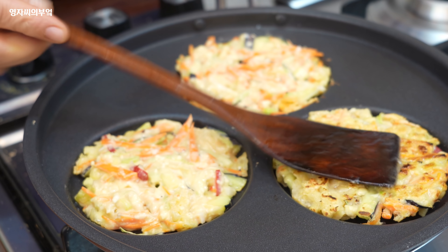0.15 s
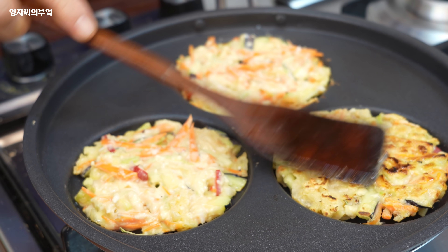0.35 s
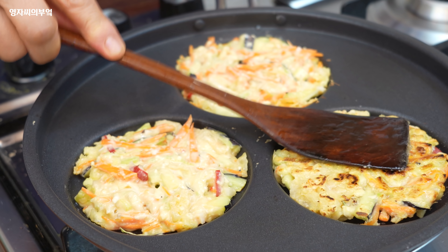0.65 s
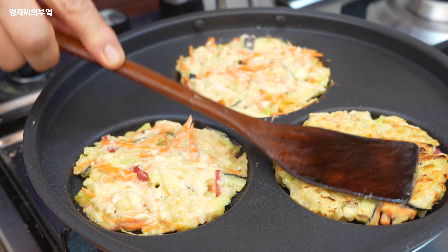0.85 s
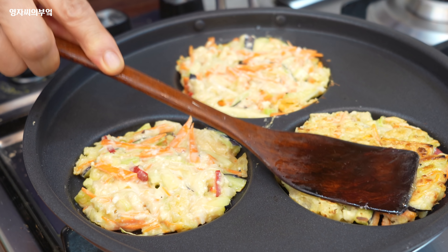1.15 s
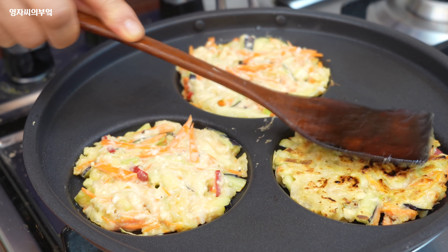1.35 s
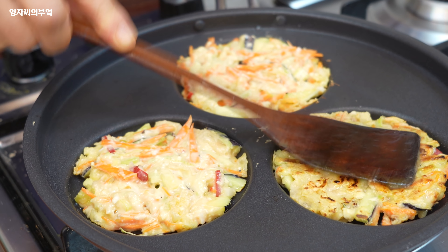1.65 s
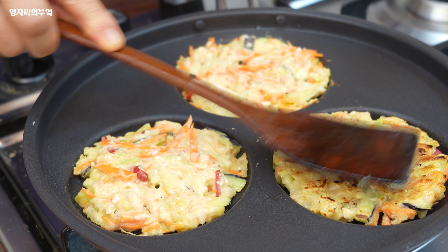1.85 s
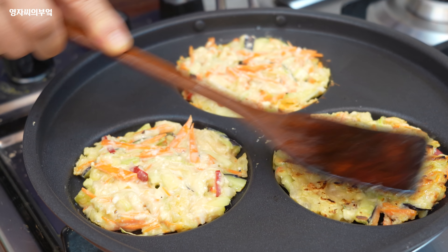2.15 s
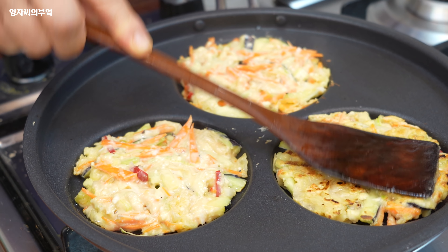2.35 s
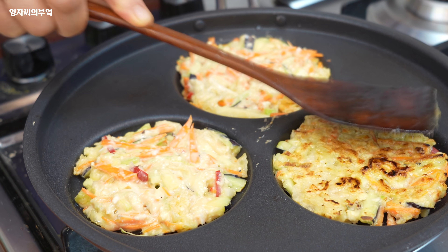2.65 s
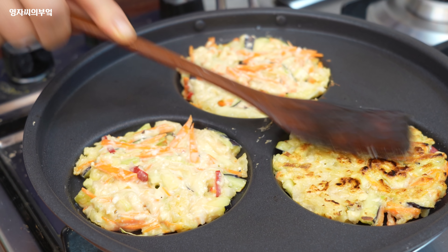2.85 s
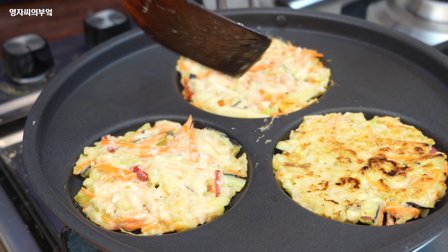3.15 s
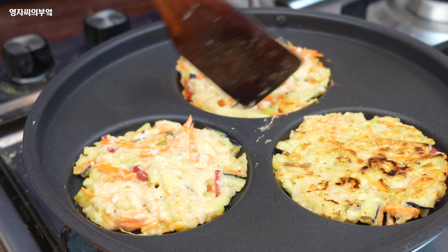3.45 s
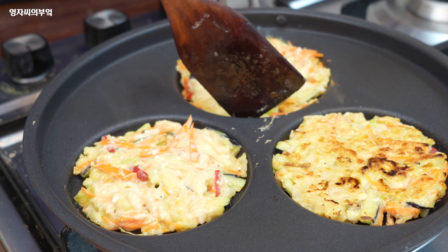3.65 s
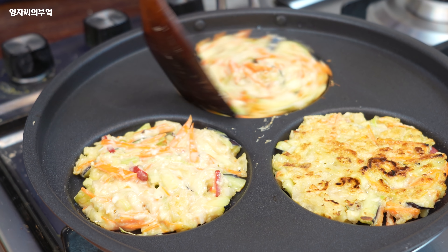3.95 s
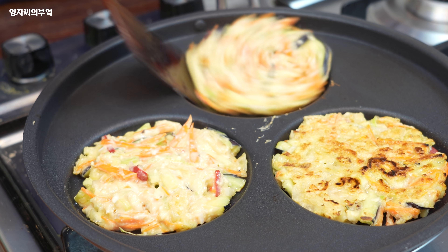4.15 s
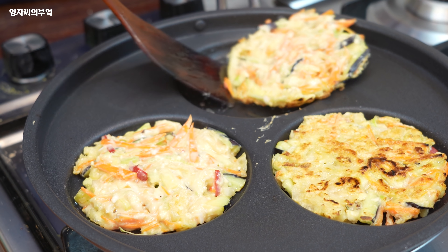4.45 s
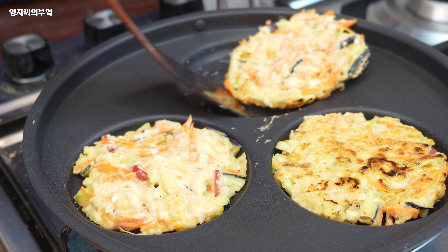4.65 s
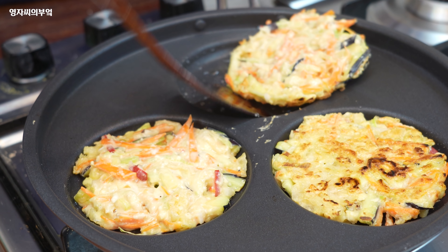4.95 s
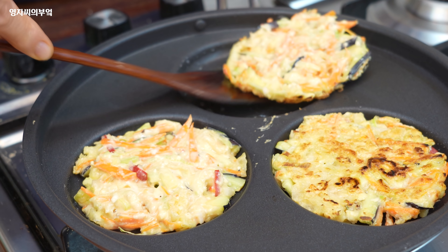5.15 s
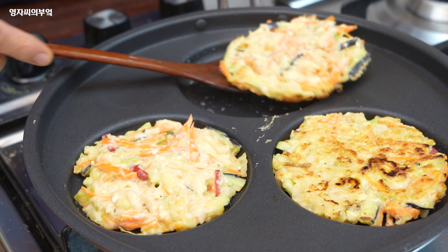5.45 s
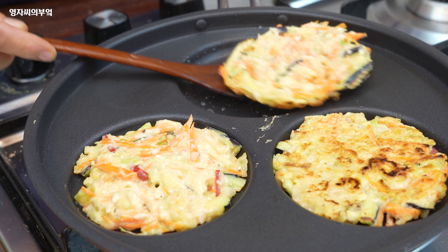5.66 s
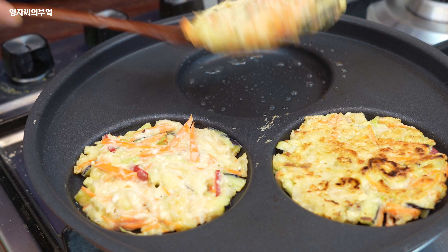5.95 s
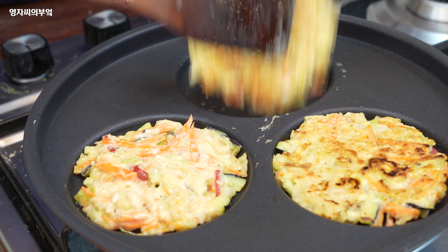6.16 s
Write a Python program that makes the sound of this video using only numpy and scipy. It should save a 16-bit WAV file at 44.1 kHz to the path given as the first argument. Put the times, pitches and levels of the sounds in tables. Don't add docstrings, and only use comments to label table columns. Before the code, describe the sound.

Hot oil sizzles and spits close up while a wooden spatula softly pats food, then scrapes and knocks on the pan as a cake is turned.

```python
import sys
import numpy as np
from scipy import signal
from scipy.fft import rfft, irfft
from scipy.io import wavfile

SR = 44100
rng = np.random.default_rng(int(sys.argv[2]) if len(sys.argv) > 2 else 0)


def store_wav(level_fs):
    pcm = np.round(np.clip(np.atleast_2d(level_fs), -1, 1) * 32767)
    wavfile.write(sys.argv[1], SR, pcm.T.astype(np.int16))


def decibels_to_gain(level_db):
    exponent = np.asarray(level_db, float) / 20
    return 10 ** exponent


N = 278271

# f/Hz, density/dB
SIZZLE_SPECTRUM = [(710, -15), (1200, -7.5), (2320, -8.5), (2560, -7), (3080, -7), (6570, -3),
                   (10500, -1.5), (12700, -3), (13800, -0.5), (15650, -2), (15950, -28), (16500, -75)]
# t/s, level/dB, lower sizzle relative/dB
SIMMER = [
    (0, -32.5, -5),
    (.9, -33.5, -6),
    (1.4, -36.5, -5.5),
    (2.9, -33.5, -6),
    (3.75, -37, -6),
    (4.3, -30, -4.5),
    (4.9, -35, -7),
    (5.5, -37, -7),
    (5.85, -38.5, -8.5),
    (6.31, -38.5, -5),
]
# peak t/s, level/dB, half width/s, lower sizzle relative/dB
SURGES = [(0, -25, 0.022, -5), (.67, -24, 0.064, -5), (1.018, -26.5, 0.058, -2.5), (1.26, -32, 0.051, -1.5),
          (1.55, -30.5, 0.066, -5), (1.82, -34.5, .06, -3.5), (2.079, -25.5, 0.046, -3),
          (2.36, -40, 0.1, -4), (2.61, -32.5, 0.042, -2.5), (2.812, -29, 0.052, -3),
          (4.101, -23, 0.032, -4.5), (4.17, -28.5, .03, -1), (4.37, -22, 0.012, -7),
          (4.42, -20, 0.012, -3.5), (4.464, -22.5, 0.014, -4.5), (4.5, -22.5, 0.019, -9),
          (4.54, -22, .02, -13), (4.69, -37, 0.068, -11), (4.93, -36, 0.015, -8), (5.149, -28, 0.063, -5),
          (5.3, -32.5, .04, -6), (5.46, -35.5, 0.05, -2), (5.64, -35, 0.027, 0), (6.29, -26, 0.021, -9.5)]
# t/s, level over the steam/dB
CRACKLE = [
    (0, -2),
    (3.9, -4.5),
    (4.15, 8),
    (4.9, -1.5),
    (5.3, -3),
    (5.8, 0),
    (6.31, -2),
]
# f/Hz, density/dB
RUMBLE_SPECTRUM = [(12, -30), (20, -29), (70, -11), (166, 1), (281, 6), (346, 0.5), (623, 2), (736, -23),
                   (835, 1), (1300, 1.5), (3000, -5.5), (3900, -55), (6600, -120)]
# t/s, level/dB
JOLTS = [(.21, -44), (.34, -47), (1.21, -49), (1.54, -39), (1.76, -43), (2.0, -47), (2.6, -42), (2.83, -42),
         (3.09, -44), (3.69, -52), (4.06, -52), (4.29, -61), (4.52, -41), (5.24, -37.5), (5.37, -36),
         (6.31, -45)]
# f/Hz, level struck with the flat/dB, level struck with the edge/dB, t60/s
PAN_MODES = [(296, -16, -13, .16), (385, -12, -13, .15), (455, -10, -10, .16), (590, -13, -6, .1),
             (637, -12, -4, .13), (830, 3, -1, .11), (875, 1, -2, .1), (969, -5, -1, .17),
             (1134, -5, -6, .11), (1373, -3, -6, .13), (1670, -8, -9, .1), (1765, -6, -7, .1),
             (1846, 1, -9, .11), (1984, 1, -9, .1), (2530, -12, -6, .09), (3200, -20, -5, .09),
             (3600, -9, 4, .09)]
# t/s, level/dB
RESTING = [
    (0, -48.5),
    (5.7, -48.5),
    (6.31, -67),
]
# middle t/s, level/dB, half width/s
STROKES = [
    (0, -45, 0.21),
    (4.08, -34.5, 0.12),
    (4.4, -30, 0.14),
    (5.13, -38, 0.085),
    (5.4, -38.5, 0.12),
]
# t/s, peak level/dB, colour f/Hz, squash length/s
SQUASHES = [(.002, -31.5, 590, 0.19), (1.2, -33, 424, 0.033), (1.73, -33, 221, 0.02),
            (4.285, -28.5, 300, 0.039), (6.275, -32, 277, 0.035), (0.581, -29, 820, 0.021),
            (0.629, -29.5, 507, 0.017), (0.659, -37, 241, .04), (0.931, -25.5, 640, 0.027),
            (1.452, -22.5, 677, 0.033), (1.727, -23.5, 700, 0.042), (1.999, -26.5, 670, 0.037),
            (2.291, -16.5, 675, .019), (2.561, -32, 397, 0.037), (2.777, -20.5, 710, 0.027),
            (2.791, -29, 231, 0.022), (3.648, -33.5, 430, 0.036), (4.021, -29, 388, .03),
            (5.39, -23, 220, 0.032), (5.6, -26.5, 250, .045)]
# t/s, peak level/dB, colour f/Hz
TICKS = [(1.099, -27, 1500), (1.192, -21.5, 1140), (1.441, -20.5, 1320), (1.716, -18.5, 1670),
         (1.964, -22, 1390), (2.28, -27, 1000), (2.326, -28, 570), (2.519, -24.5, 1200), (2.771, -15, 1080),
         (2.982, -23.5, 1290), (3.648, -30, 1480), (3.819, -29, 1780), (4.113, -21, 1340),
         (5.553, -25, 2810), (5.585, -22.5, 1200), (6.041, -26, 1900), (6.233, -27, 1290)]
# t/s, peak level/dB, colour f/Hz
LOUD_SPITS = [(0.115, -12, 13500), (0.3805, -13, 7840), (0.5602, -11, 5340), (0.7158, -15, 5850),
              (0.7964, -7.5, 9400), (0.8006, -9, 7100), (0.83, -10.5, 10200), (0.9787, -13, 6800),
              (1.2994, -17, 5570), (1.6322, -11.5, 10800), (1.6566, -16, 8940), (1.715, -11, 7800),
              (1.732, -16, 10600), (1.8957, -19, 13400), (1.9635, -14, 7200), (1.9809, -20, 7420),
              (2, -10, 5100), (2.4615, -7.5, 7800), (2.5102, -36, 13200), (2.638, -8, 8500),
              (2.931, -15, 10700), (3.3074, -5, 12800), (3.4531, -23, 13900), (3.486, -8.5, 5160),
              (3.4983, -15, 10500), (3.7392, -18, 7600), (3.8472, -16, 10600), (3.884, -14, 8900),
              (3.918, -18, 13400), (4.0156, -16, 13800),
              (4.1407, -2, 8650), (4.1825, -1.5, 6560), (4.3157, -3, 6200), (4.3457, -9.5, 12600),
             (4.379, -8, 14000), (4.4344, -5, 10300), (4.4618, -1, 13400), (4.4732, -3, 11500),
             (4.5534, -5, 13400), (4.599, -12, 11100), (4.6057, -2, 12100), (4.6478, -5, 11100),
             (4.687, -9, 11400), (4.7164, -2.5, 12100), (4.7833, -6.5, 11200), (4.807, -10, 14000),
             (4.8477, -12, 14100), (4.9203, -14.5, 12200), (5.136, -5.5, 13300), (5.1522, -5, 13500),
             (5.176, -1.5, 13300), (5.2247, -15, 13400), (5.2505, -9, 12300), (5.285, -14, 13900),
             (5.4352, -8, 14100), (5.5526, -14, 13300), (6.0422, -10, 8200), (6.1459, -12.5, 13400),
             (6.19, -13.5, 7800), (6.2165, -13.5, 13900)]
# middle t/s, rate/dB re 1 per s, half width/s
BARE_OIL = [
    (4.15, 31, .06),
    (4.45, 36.5, .15),
    (4.75, 36, .15),
    (5.15, 30.5, .1),
    (5.5, 30, .2),
]
# t/s, peak level/dB, favoured f/Hz, breadth/octaves, edge share/0-1
KNOCKS = [(.983, -36, 970, 0.068, 1), (4.284, -15.5, 990, 3.4, 0.3), (4.4079, -3, 1630, 2.8, 1),
          (4.4525, -16, 860, 0.21, .4), (4.5692, -6.5, 1220, 3.8, 0.9), (4.679, -20.5, 1800, 1.6, 0),
          (4.93, -32, 940, 1.1, 0.5), (5.034, -47, 970, 0.27, .5), (5.044, -27.5, 3120, 0.15, 0.5),
          (5.137, -26, 1680, .8, 0.1), (5.09, -39.5, 905, 0.34, 0), (5.21, -36, 1950, 0.26, 0.1),
          (5.2756, -3.5, 1550, 4.1, 0), (5.291, -14, 820, 0.43, 0.5), (5.347, -22.5, 600, 0.98, 0.4),
          (5.385, -24.5, 590, 0.85, 0.5), (5.458, -13, 775, 1.3, 0.76), (5.606, -27, 550, 0.86, 0),
          (6.272, -12, 1420, 0.97, .7), (6.293, -24, 975, 0.36, 0.2)]


def rms_one(x):
    return x / np.sqrt(np.mean(x ** 2) + 1e-20)


def in_time(rows):
    s, *columns = np.transpose(rows)
    return [np.interp(np.arange(N) / SR, s, c) for c in columns]


def swells(rows):
    t = np.arange(N) / SR
    return np.array([decibels_to_gain(2 * row[1]) * np.exp(-((t - row[0]) / row[2]) ** 2) for row in rows])


def drift(rate_hz):
    r = np.exp(-2 * np.pi * rate_hz * 40 / SR)
    slow = signal.lfilter([1], [1, -2 * r, r * r], rng.standard_normal(N // 40 + 2002))[2000:]
    return np.interp(np.arange(N) / 40, np.arange(len(slow)), rms_one(slow))


def ring(clicks, hz, t60):
    r = decibels_to_gain(-60 / (t60 * SR))
    w = 2 * np.pi * hz / SR
    return signal.lfilter([0, np.sin(w)], [1, -2 * r * np.cos(w), r * r], clicks + 1e-18)


def colour(x, spectrum):
    hz, db = np.transpose(spectrum)
    gain = decibels_to_gain(np.interp(np.log(np.fft.rfftfreq(N, 1 / SR) + 1), np.log(hz), db))
    return rms_one(irfft(rfft(x) * gain, N))


def split(x, hz, kind):
    return signal.sosfilt(signal.butter(2, hz, kind, fs=SR, output="sos"), x)


def grains(per_s, spread_db):
    sizes = decibels_to_gain(spread_db * np.minimum(rng.exponential(1, N), 4)) * rng.choice([-1, 1], N)
    return sizes * (rng.random(N) < per_s / SR)


def add(out, s, sound, peak_db):
    at = round(s * SR)
    out[at:at + len(sound)] += (decibels_to_gain(peak_db) * sound / np.abs(sound).max())[:N - at]


def frying():
    simmer_db, simmer_lower_db = in_time(SIMMER)
    simmer = decibels_to_gain(2 * simmer_db)
    surge = swells(SURGES)
    power = simmer + surge.sum(axis=0)
    lower_db = (simmer * simmer_lower_db + np.array(SURGES)[:, 3] @ surge) / power
    return 10 * np.log10(power), lower_db


def sizzle():
    level_db, lower_db = frying()
    crackle = decibels_to_gain(in_time(CRACKLE)[0])
    clumps = np.tanh(1.4 * drift(27))
    bursts = grains(2500 * decibels_to_gain(4.6 * clumps), spread_db=3.5)
    dealt = rng.integers(0, 16, N)
    bubbles = np.zeros(N)
    for k, hz in enumerate(np.geomspace(3000, 15500, 16)):
        bubbles += rms_one(ring(bursts * (dealt == k), hz, 9.5 / hz)) * np.sqrt(hz)
    steam = rng.standard_normal(N) * decibels_to_gain(0.19 * drift(45) + 0.88 * crackle * clumps)
    mix = (steam + crackle * rms_one(bubbles)) / np.hypot(1, crackle)
    mix = colour(mix, SIZZLE_SPECTRUM)
    low = split(mix, [3500, 7500], "band")
    return decibels_to_gain(level_db - 2.5) * (mix + (decibels_to_gain(lower_db + 7.0) - 1) * low)


def stove():
    burner = decibels_to_gain(-53 + 2.76 * drift(9.3)) * colour(rng.standard_normal(N), RUMBLE_SPECTRUM)
    shaking = split(split(rng.standard_normal(N), [38, 110], "band"), 240, "low")
    calm_db, jolt_s = -56, .03
    power = decibels_to_gain(2 * calm_db) + swells([(s, db, jolt_s) for s, db in JOLTS]).sum(axis=0)
    return burner + decibels_to_gain(-7.0) * np.sqrt(power) * rms_one(shaking)


def pan(force, strengths):
    damping = .5
    modes = zip(PAN_MODES, strengths)
    return sum(gain * ring(force, hz, damping * t60) for (hz, flat_db, edge_db, t60), gain in modes)


def rubbing():
    slips = grains(700, spread_db=3.0)
    body = rms_one(pan(slips, decibels_to_gain(np.array(PAN_MODES)[:, 1])))
    scrape = rms_one(split(slips, [500, 2600], "band"))
    power = decibels_to_gain(2 * in_time(RESTING)[0]) + swells(STROKES).sum(axis=0)
    return decibels_to_gain(-5.5) * np.sqrt(power) * rms_one(body + 3.5 * scrape)


def pats():
    out, t = np.zeros(N), np.arange(6000) / SR
    tick_s = 0.0029
    rows = [(*tick, tick_s) for tick in TICKS] + SQUASHES
    for s, db, hz, length in rows:
        noise = rng.standard_normal(len(t))
        slap = split(noise * np.exp(-t / 0.0014), [400, min(4200, 1000 + 1.5 * hz)], "band")
        dying = np.exp(-t / length)
        squash = dying * split(noise, [0.57 * hz, 1.93 * hz], "band")
        squash += (1 - dying) * split(noise, [.55 * hz, 1.15 * hz], "band")
        add(out, s, slap + 0.98 * squash * dying, db)
    return out


def small_spits():
    tries, calm_per_s = 600, 4
    over_sizzle_db, spread_db, loudest_db = 12, 2.5, -12
    when, chance, size, pitch = rng.random((tries, 4)).T
    at = (when * (N - 1)).astype(int)
    per_s = calm_per_s + np.sqrt(swells(BARE_OIL).sum(axis=0))[at]
    born = chance < per_s * N / SR / tries
    db = np.minimum(frying()[0][at] + over_sizzle_db - spread_db * np.log(size + .01), loudest_db)
    return np.transpose([at / SR, db, 7500 * 1.8 ** pitch])[born]


def spits():
    out, t = np.zeros(N), np.arange(500) / SR
    burst_lag_s = .0012
    for s, db, hz in [*LOUD_SPITS, *small_spits()]:
        noise = rng.standard_normal(len(t))
        crack = noise * (np.exp(-t / .0003) + .09 * np.exp(-t / .002))
        crack[3] += 1.5
        crack[22:] -= .3 * crack[:-22]
        crack = crack + .8 * split(crack, [.7 * hz, 1.15 * hz], "band")
        crack = split(split(crack, [.5 * hz, 16500], "band"), .2 * hz, "high")
        add(out, s + burst_lag_s, crack, db + 0.7)
    return out


def knocks():
    out, t = np.zeros(N), np.arange(12000) / SR
    mode_hz, flat_db, edge_db, _ = np.transpose(PAN_MODES)
    for s, db, hz, octaves, edge in KNOCKS:
        chatter_s = 0.0032 * decibels_to_gain(-.5 * db)
        signs = rng.choice([-1, 1], len(PAN_MODES))
        force = .1 * rng.standard_normal(len(t)) * np.exp(-t / chatter_s)
        force[0] = 1
        force = split(force, 5100, "low")
        reach = 2 ** min(octaves, 1.3)
        thud = split(force, [hz / reach, hz * reach], "band")
        favour_db = -6 * (np.log2(mode_hz / hz) / octaves) ** 2
        strengths = signs * decibels_to_gain(flat_db + edge * (edge_db - flat_db) + favour_db)
        add(out, s, pan(force, strengths) + 38.4 * thud, db)
    return out


def kitchen(x, t60=0.29):
    t = np.arange(SR // 2) / SR
    tail = split(rng.standard_normal(len(t)), [200, 4000], "band") * decibels_to_gain(-60 * t / t60) * (t > .006)
    return signal.fftconvolve(x, tail / np.linalg.norm(tail))[:N]


def scene():
    steady = sizzle() + stove() + rubbing()
    hits = split(pats(), 97, "high") + spits() + split(knocks(), 215, "high")
    return (steady + hits + decibels_to_gain(-13.5) * kitchen(hits))[None]


def low_pass(x):
    return signal.sosfilt(signal.butter(12, 16990, fs=SR, output="sos"), x)


def record(dry):
    top_cut = signal.cheby2(10, 60, 16950, fs=SR, output="sos")
    mix = signal.sosfilt(top_cut, np.tanh(dry))
    return low_pass(mix)


dry = scene()
out = record(dry)
store_wav(out)
```